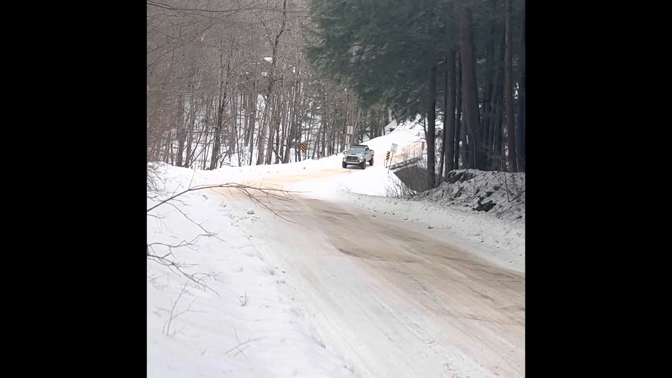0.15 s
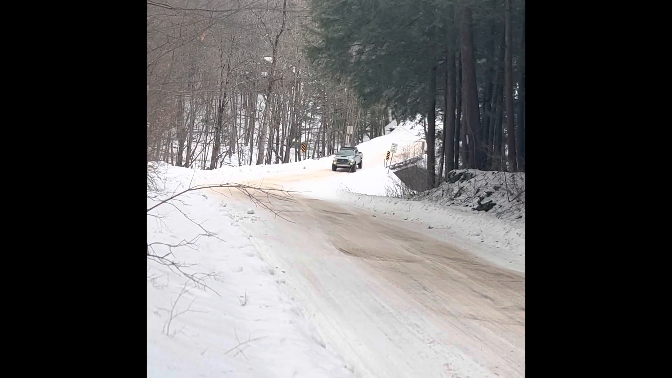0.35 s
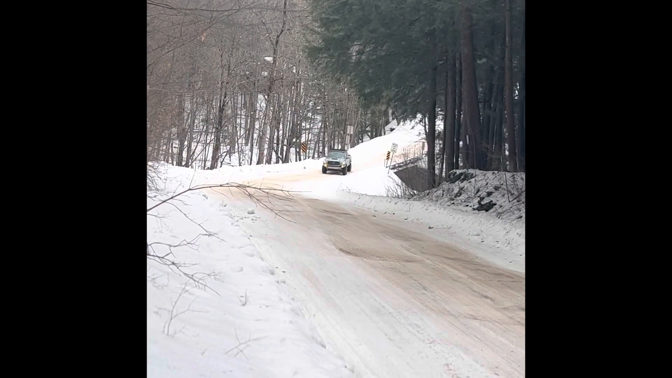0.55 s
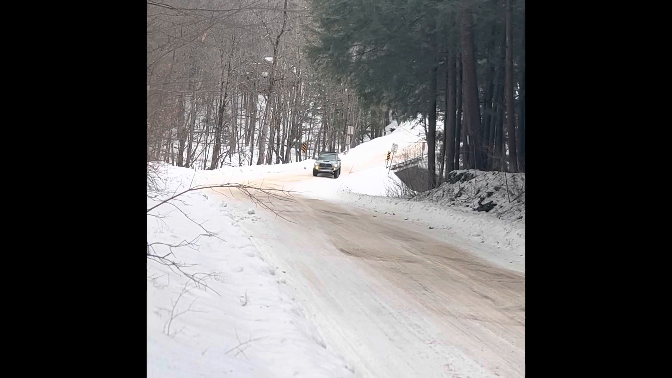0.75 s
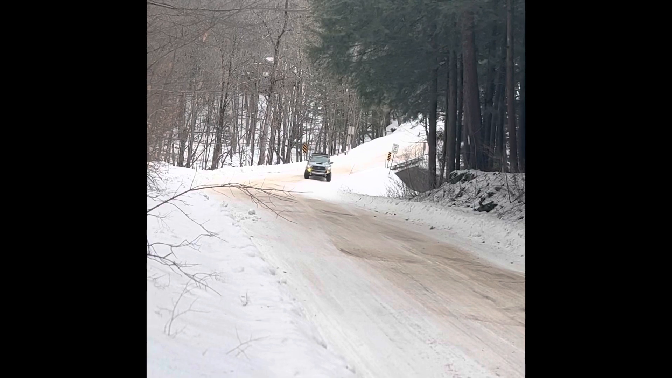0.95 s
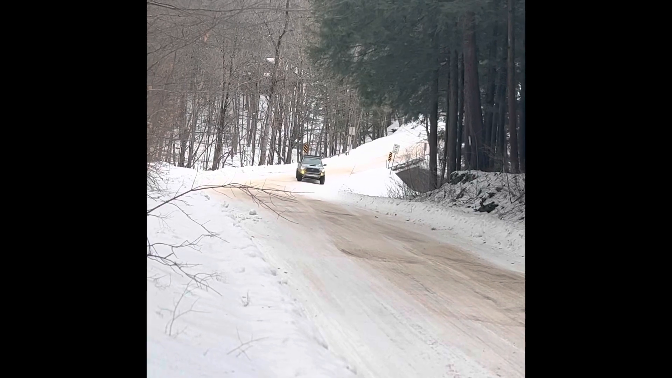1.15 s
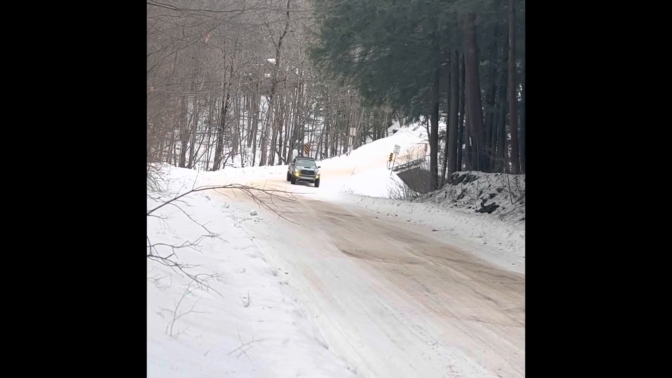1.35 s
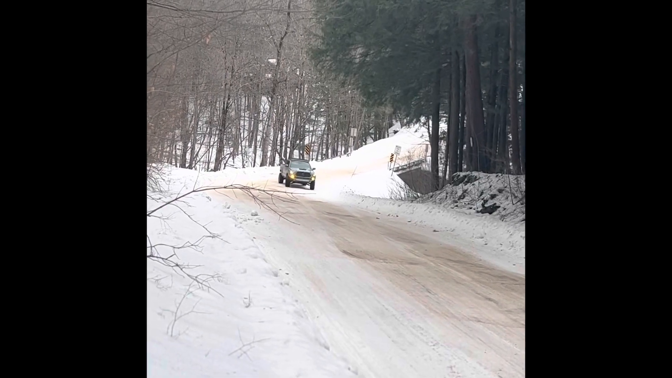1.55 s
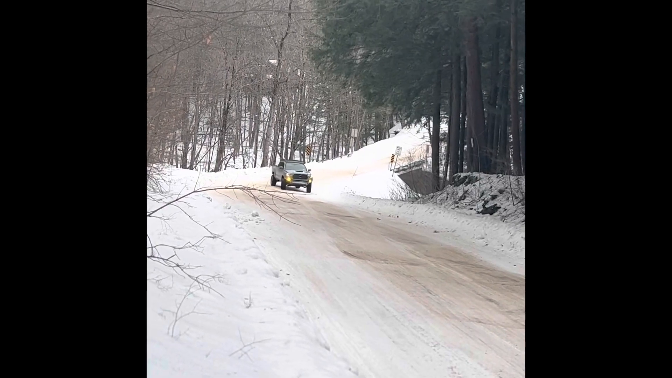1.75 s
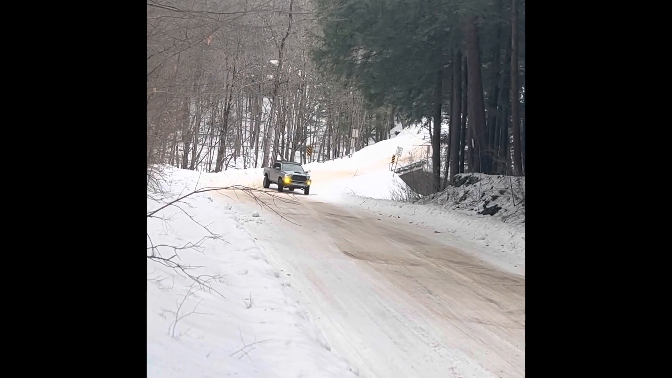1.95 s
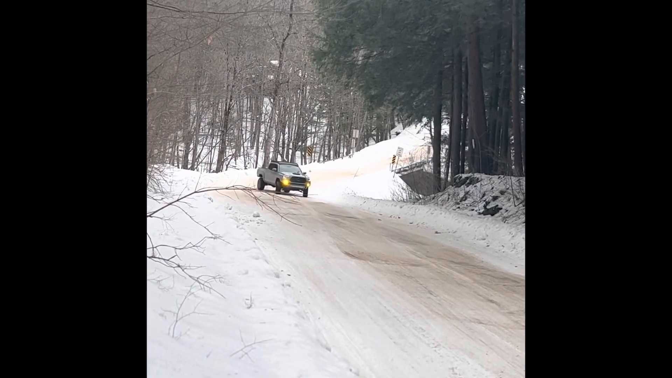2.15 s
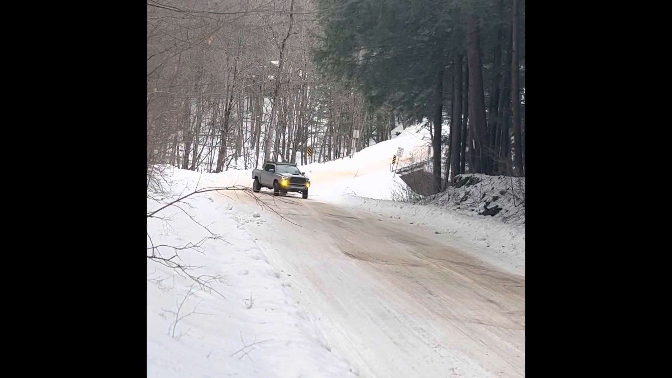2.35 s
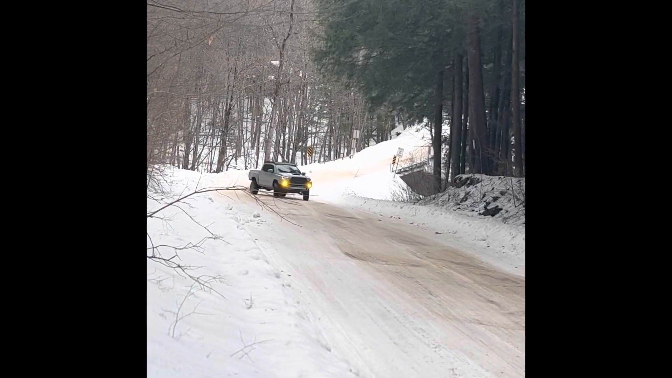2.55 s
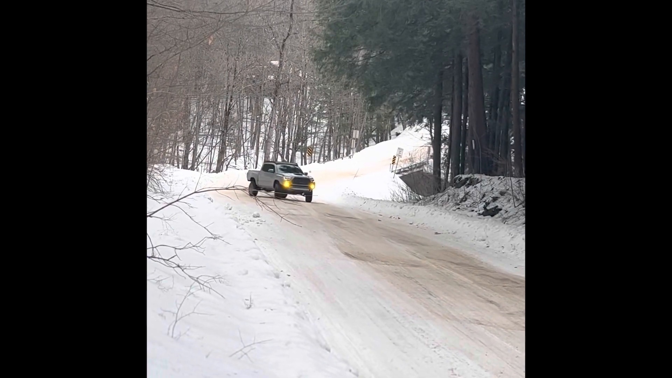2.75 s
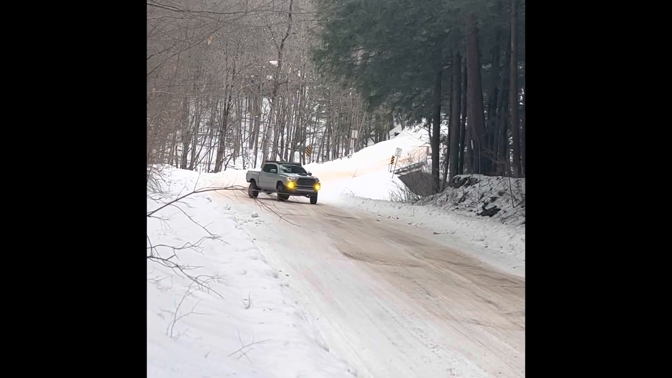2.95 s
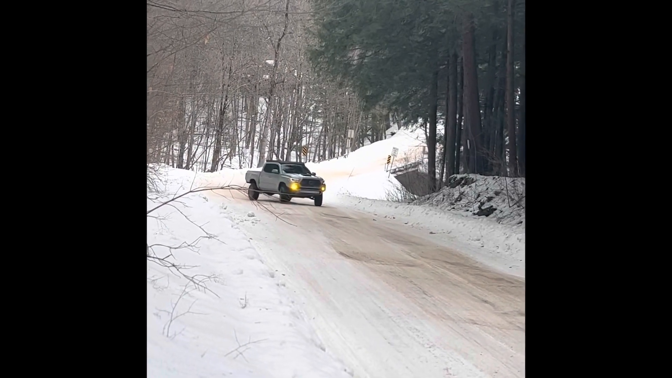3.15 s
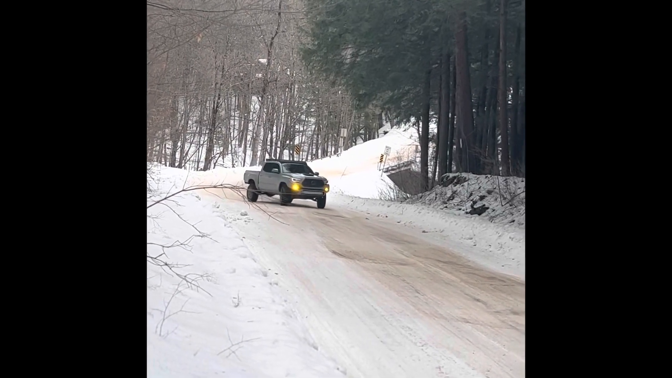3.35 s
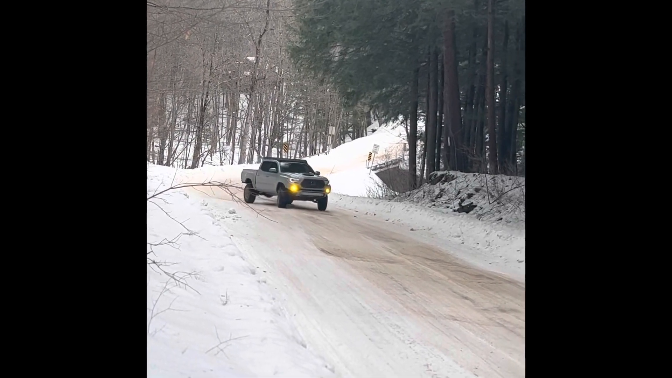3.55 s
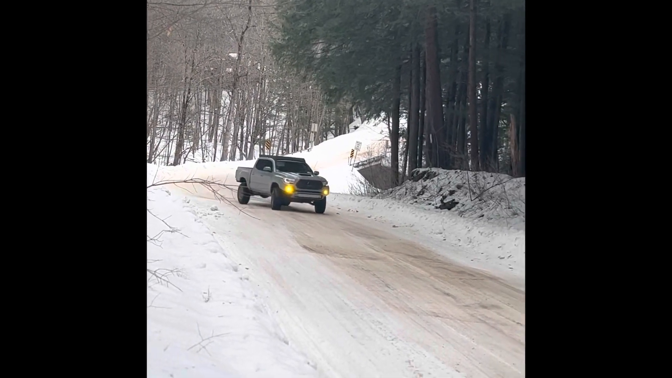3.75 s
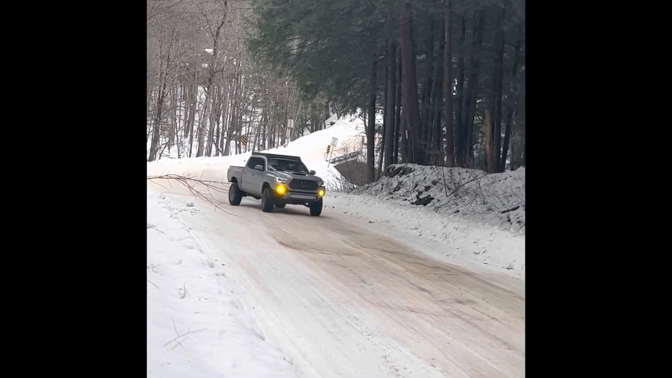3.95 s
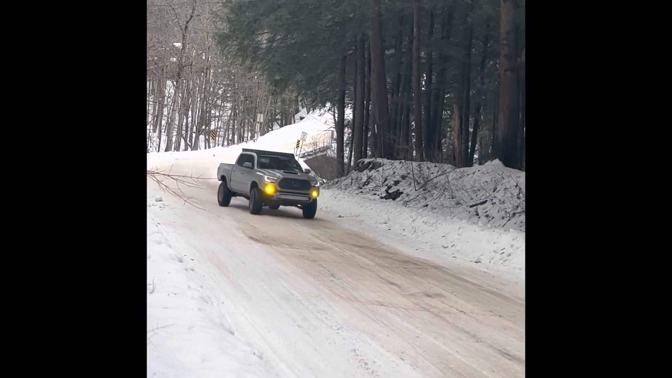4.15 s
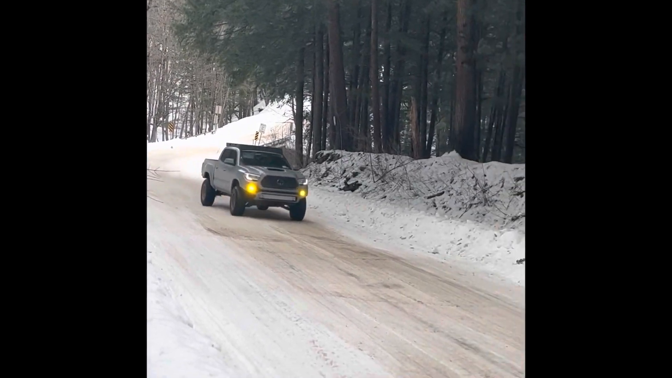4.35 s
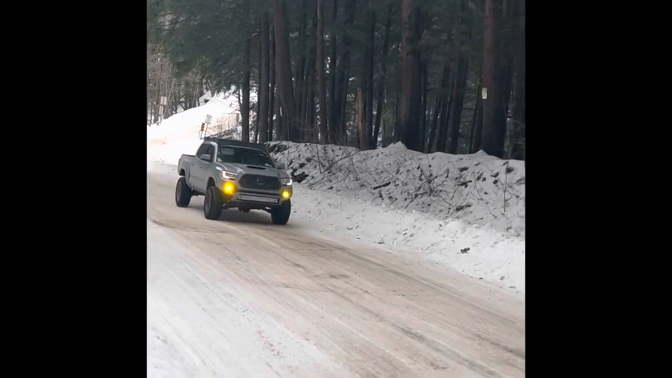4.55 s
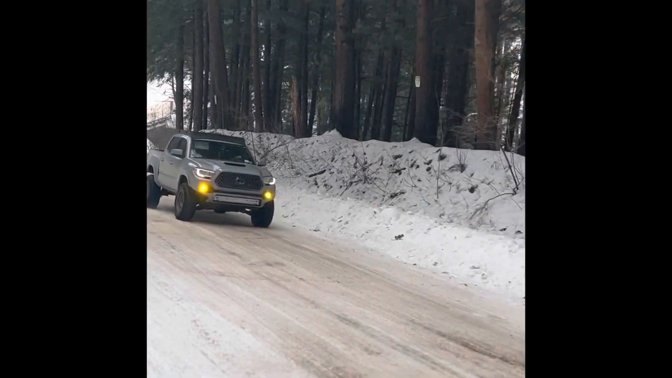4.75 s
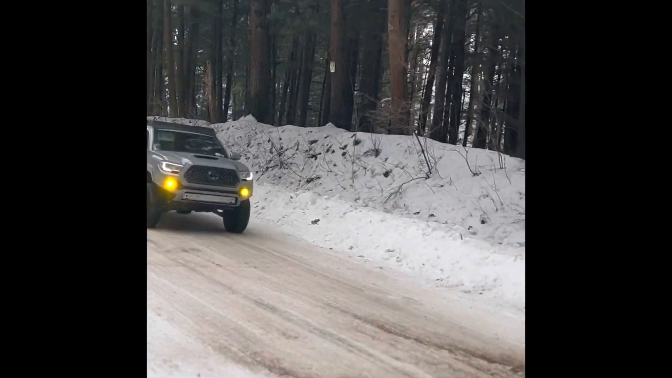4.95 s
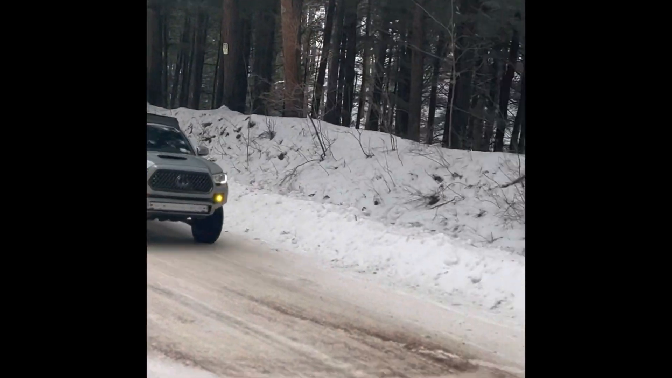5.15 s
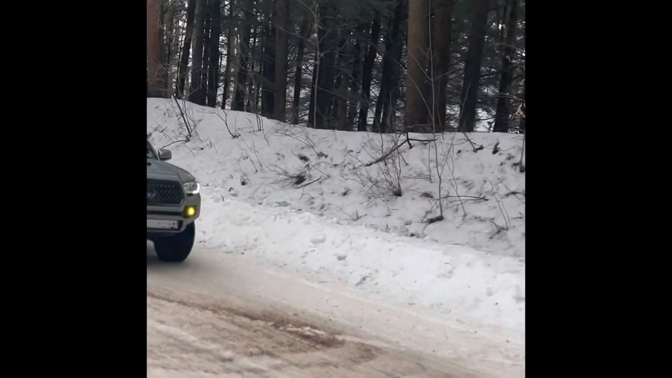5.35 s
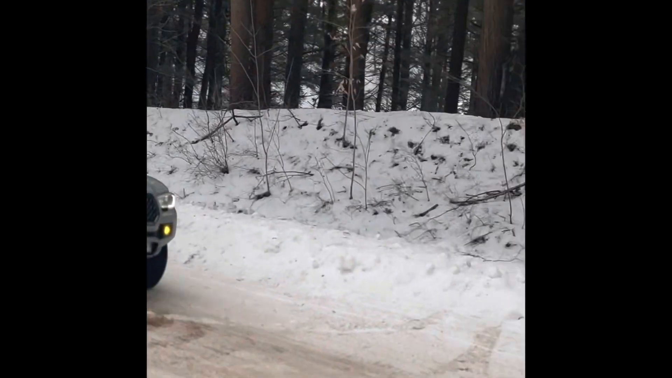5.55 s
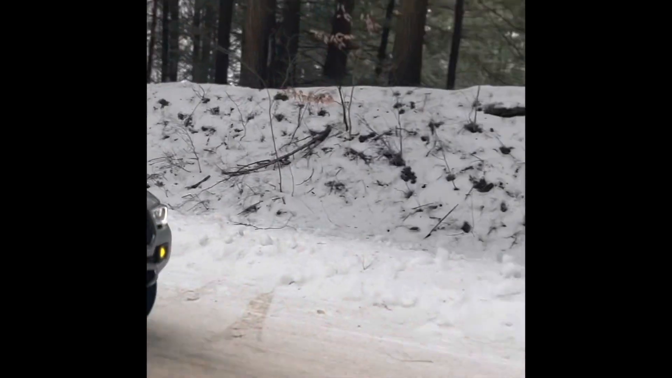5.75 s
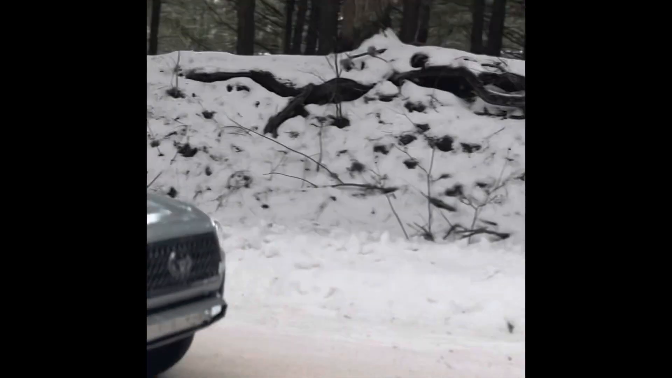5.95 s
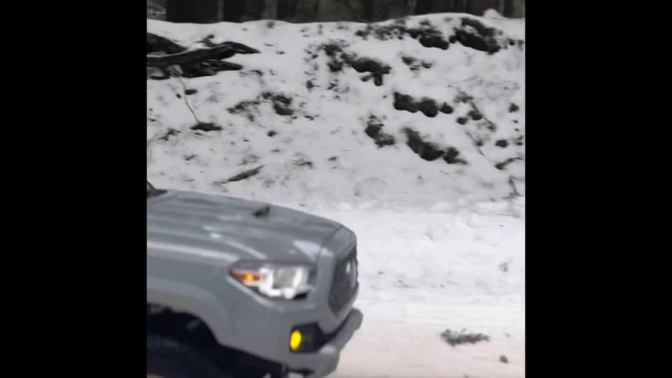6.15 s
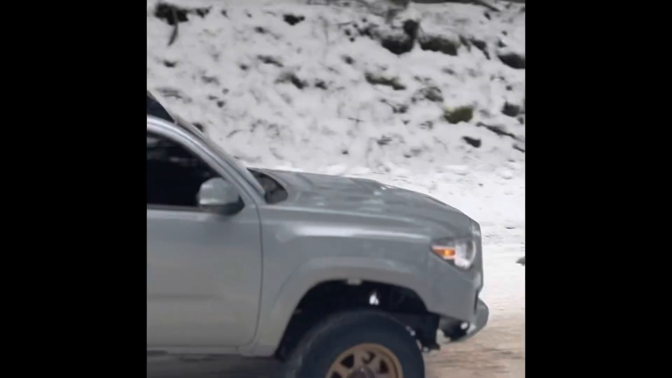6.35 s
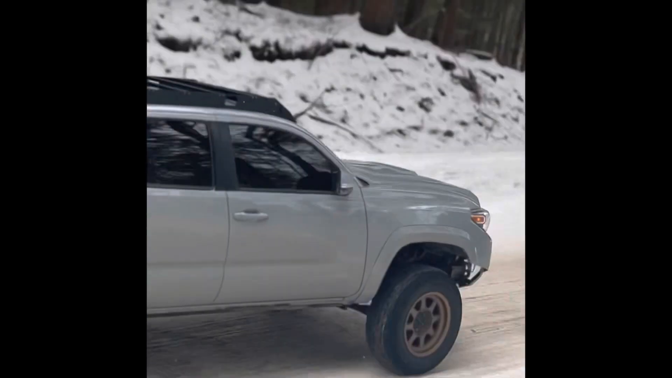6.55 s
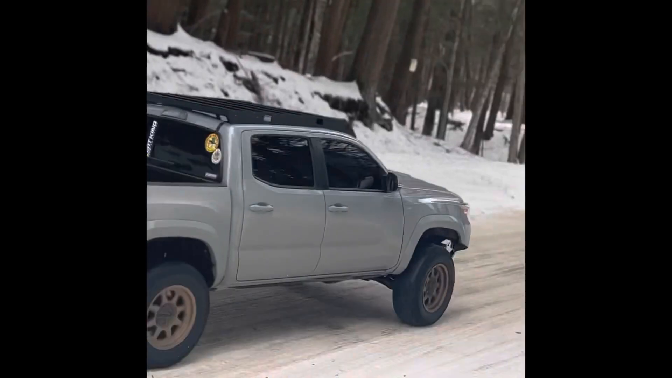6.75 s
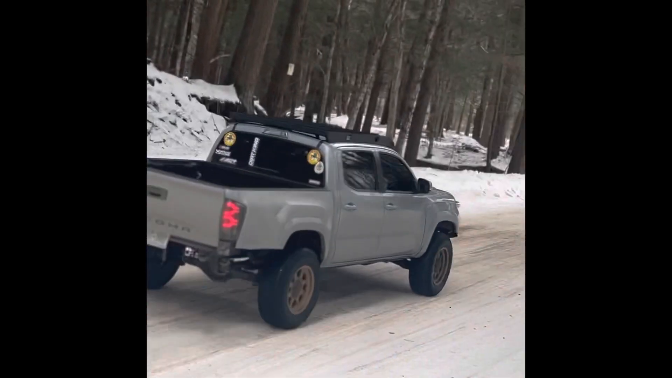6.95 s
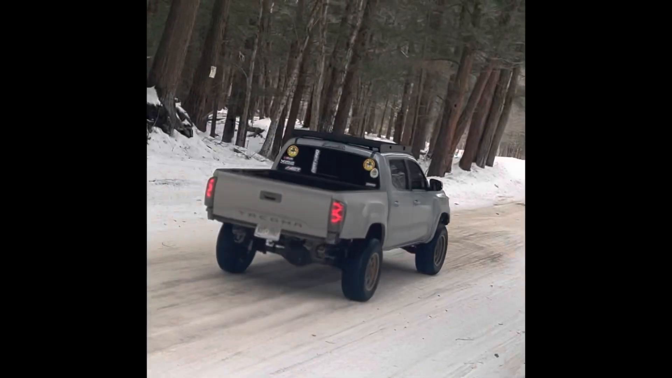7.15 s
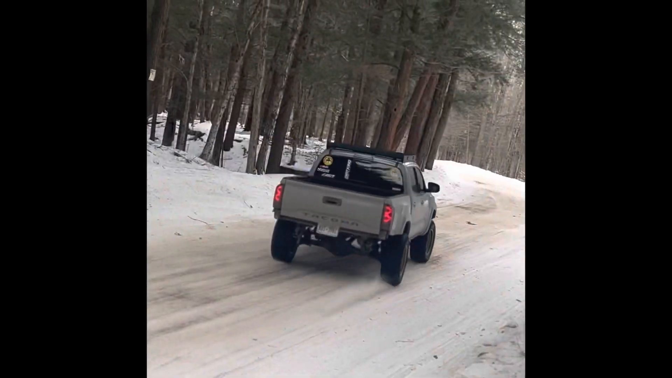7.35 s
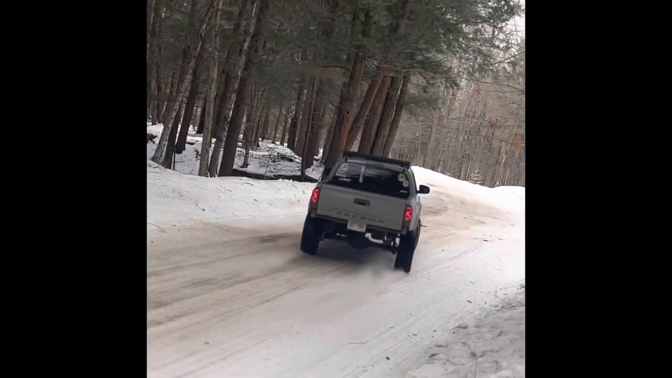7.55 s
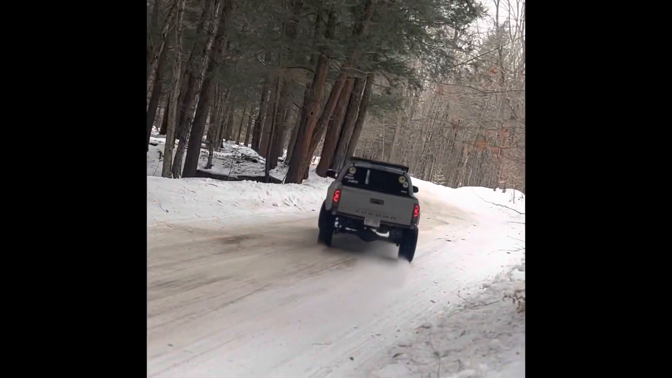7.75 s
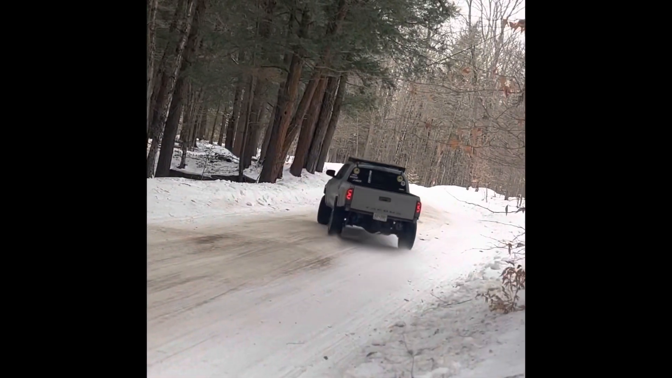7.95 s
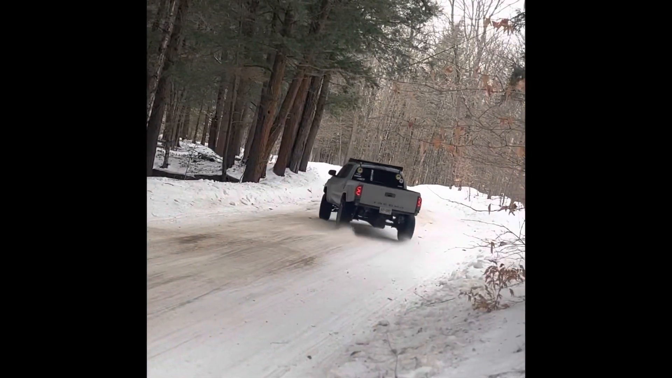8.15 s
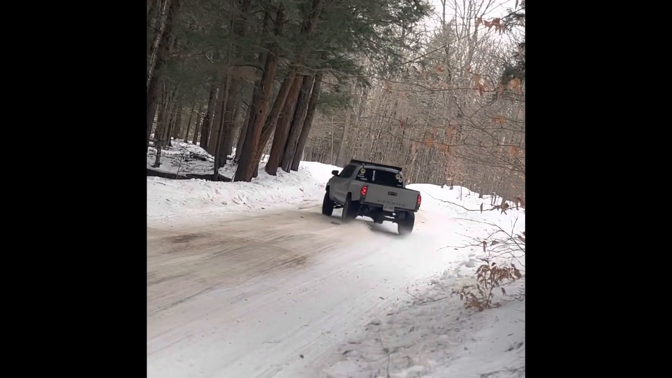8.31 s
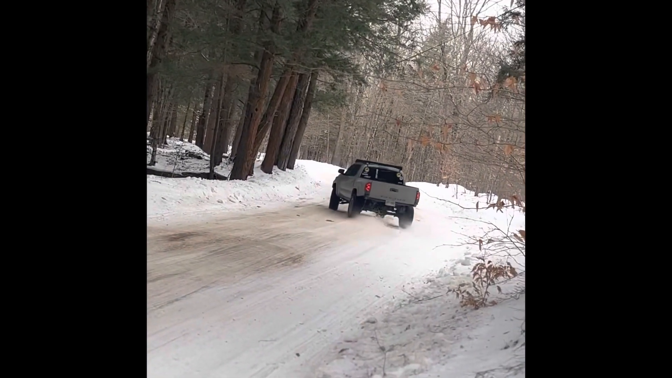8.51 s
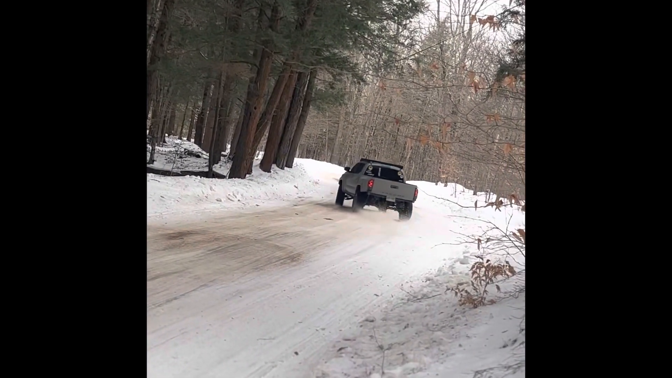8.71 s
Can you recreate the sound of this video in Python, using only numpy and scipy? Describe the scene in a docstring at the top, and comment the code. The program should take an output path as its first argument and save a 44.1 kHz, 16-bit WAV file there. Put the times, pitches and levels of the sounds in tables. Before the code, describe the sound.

A pickup with a raspy exhaust nears on a snowy forest road, roars past close by with tyres scrubbing packed snow, then pulls away.

```python
"""Soft bumps at a hand-held microphone and a low drone come first: a V6 pickup nears on a snowy forest road.
It passes close by just after six seconds and pulls away. The exhaust is a sum of engine orders with pulsed rasp.
Tyres on packed snow are banded noises that follow their bite; they splash, spin, scrub and throw snow and grit.
Delayed noise tails make the trees' echo, a moving delay the snowbank's. Wind puffs, ticks and rubs lie close by."""
import sys
import numpy as np
from scipy import signal
from scipy.fft import rfft, irfft, next_fast_len
from scipy.io import wavfile
from scipy.ndimage import map_coordinates

SR = 44100
rng = np.random.default_rng(int(sys.argv[2]) if len(sys.argv) > 2 else 0)


def waveform_to_disk(signal):
    """Save audio, clipped to [-1, 1], as 16-bit WAV at the path in sys.argv[1]."""
    frames = np.transpose(np.atleast_2d(signal))
    scaled = np.clip(frames, -1, 1) * 32767
    samples = np.round(scaled).astype(np.int16)
    wavfile.write(sys.argv[1], SR, samples)


N = 387198

# Engine speed. Each row: time in seconds, firing rate of one cylinder bank in Hz.
BANK_FIRING = [(0.0, 58.3), (0.22, 64), (0.46, 73.56), (0.85, 82.8), (0.99, 82.1), (1.78, 99.6),
               (1.94, 106), (2.1, 110.7), (2.31, 102.1), (2.76, 112.7), (3.49, 123.3), (3.72, 131.6),
               (3.86, 132.5), (3.93, 137), (4.05, 133.3), (4.16, 125), (4.27, 117.5), (4.34, 108.5),
               (4.5, 100), (4.72, 88.2), (4.86, 87.9), (4.96, 89.1), (5.04, 85.9), (5.154, 91.2),
               (5.228, 98.4), (5.45, 101.3), (5.56, 106.1), (5.68, 114.7), (5.765, 116.7), (5.87, 109),
               (6.01, 100.6), (6.118, 91), (6.196, 88.16), (6.46, 85.83), (6.6, 80.5), (6.8, 68.35),
               (6.97, 62), (7.1, 61.83), (7.65, 70.6), (7.76, 72.13), (7.88, 66.9), (8.03, 64.4),
               (8.35, 71.1), (8.46, 71.4), (8.56, 74.3), (8.78, 77.2)]
# Exhaust as the throttle opens and closes. Each row: time in seconds, level of the firing note in dB,
# lift of the orders above it in dB, extra lift of the odd ones among them in dB.
THROTTLE = [(0, -46, -7, -4), (0.7, -58.5, 1, 5), (1.15, -44.5, -1.5, 1), (1.45, -40, 5.5, -6.5),
            (1.7, -35.5, -6, 1.5), (1.88, -35, -12.5, 3), (2.1, -39.5, -2, 0), (2.3, -40.5, -4, 1),
            (2.7, -40.5, 0, 1.5), (3.3, -35, 4, -8), (3.6, -30.5, 3, -11), (3.98, -35, 13, -21),
            (4.06, -37.5, 13, -9), (4.125, -50, 12, 12), (4.18, -38.5, -4, -1), (4.34, -33, -4, -2),
            (4.43, -43, -6, -2), (4.5, -49, -11, -4), (4.6, -43, 2, 3), (4.72, -36.5, 8.5, -8),
            (5.05, -25.5, 5.5, -7.5), (5.4, -22, 7, -8), (5.54, -19.5, 3.5, -10), (5.66, -20, 4, 0),
            (5.77, -15.5, 5, -8.5), (5.88, -25, -6, 8), (6.02, -21.5, -9, -6), (6.14, -33, 10.5, -8),
            (6.22, -21.5, 1, 0), (6.38, -13.5, -15, 7.5), (6.56, -27, -5.5, 0.5), (6.65, -40, -3, -3),
            (6.95, -38, 3.5, 4), (7.09, -26.5, -3, -0.5), (7.38, -24, -2, -2.5), (7.625, -21.5, -5, -10),
            (7.675, -31, -5.5, 0), (7.79, -44, -7, 1), (7.93, -42.5, -0.5, 6), (8.03, -31.5, -12.5, 7.5),
            (8.24, -27.5, -11, 5), (8.33, -25.5, -5.5, -0.5), (8.78, -24.5, -4.5, -2.5)]
# Resonances of the pipe. Each row: frequency in Hz, level against the firing note in dB.
PIPE_RESONANCES = [(68, -7), (85, -15.5), (115, -14), (200, -7.5), (250, 0), (305, -6.5), (340, -2),
                   (375, -8), (405, -5), (435, -13), (468, -15), (520, -21), (620, -28)]
# Spectra of noise. Each row: frequency in Hz, relative level of the third octave there in dB.
RASP_SPECTRUM = [(400, 8.5), (560, -4), (780, -10), (1050, -14), (1500, -26), (2200, -14.5), (3500, -39)]   # gas tearing out of the pipe
RUMBLE_SPECTRUM = [(25, -25), (38, -6), (52, 0.5), (85, 0.5), (130, -5.5), (200, -15), (400, -10.5)]
BOOM_SPECTRUM = [(70, -20), (120, 1), (220, 3), (380, -2.5), (520, -7), (800, -43)]
ROAR_SPECTRUM = [(250, -3), (480, -3), (620, 2.5), (780, 2.5), (1000, -2), (1250, -7), (1550, -8.5),
                 (2000, -21), (3200, -53)]
CRUNCH_SPECTRUM = [(1000, -24), (1550, 9), (2000, 1.5), (2500, 2), (3200, -6.5), (4200, -7), (6000, -51)]
SCRUB_SPECTRUM = [(500, -6), (750, 5.5), (980, 4), (1250, 0), (1600, -10), (2100, -16), (3500, -55)]
GRIT_SPECTRUM = [(2500, 3.5), (3800, -1.5), (4600, 0.5), (5600, -6), (7000, -7), (10000, -30)]
SPRAY_SPECTRUM = [(4500, -28), (6500, 7), (8500, 7.5), (10300, 8.5), (12000, -4), (16000, 2.5)]
SHATTER_SPECTRUM = [(1800, -8), (2800, 3), (4200, -7), (6000, -3), (10000, -4), (15000, -14)]   # bursting lumps of snow
BUFFET_SPECTRUM = [(35, -25), (55, 1), (85, 0), (115, -17), (180, -5.5)]
RUSTLE_SPECTRUM = [(2700, -24), (3300, -2), (3700, -4), (4500, -2), (5800, -6), (7500, -31)]
# Bite of the tyres on the snow, which drives the road noises. Each row: time in seconds, bite in dB.
TYRE_BITE = [(0.0, -63), (0.71, -62), (0.93, -58.5), (1.64, -56.5), (3.2, -50.5), (3.86, -44), (4.35, -42),
             (4.4, -40), (4.7, -43.5), (5.2, -37), (5.62, -32.5), (6.46, -36), (6.72, -37.5), (6.82, -40.5),
             (6.97, -43.5), (7.65, -45.5), (8.2, -48.5), (8.32, -46), (8.5, -49), (8.78, -49)]
# Bursts of tyre noise: a splash in a rut, wheelspin, sideways scrubs. Each row: start in seconds,
# end in seconds, level of the pitched noise in dB, its pitch in Hz, thrown grit level in dB,
# sag by the end of the burst in dB.
TYRE_BURSTS = [(2.428, 2.62, -39.5, 756, -80, 0.5), (3.701, 4.049, -49, 798.3, -49.5, -2),
               (4.149, 4.28, -31, 1000, -47, 1), (4.394, 4.84, -32.5, 918, -51, 7),
               (5.41, 6.397, -20.5, 903.2, -48, 5.5), (6.576, 6.731, -16.5, 1011, -40, 9),
               (6.761, 7.019, -26, 800.6, -66, 4), (7.67, 8.04, -29, 1189, -63, 6),
               (8.279, 8.38, -41, 899, -50, 0)]
# Brief tones: a low one lingering after the throttle closes, a faint high whine.
# Each row: centre in seconds, half length in seconds, pitch in Hz, level in dB.
BRIEF_TONES = [(4.617, 0.18, 219, -34.5), (7.514, 0.12, 1355, -42.5)]
# Ice cracking under the tyres. Each row: time in seconds, relative level in dB.
ICE_CRACKS = [(4.3806, -23), (4.8535, -29), (6.5384, -25), (6.7003, -23), (7.1352, -37), (7.2966, -33),
              (8.253, -43)]
# Lumps flung from the tyres. Each row: centre in seconds, half length in seconds, level in dB.
SNOW_CLUMPS = [(4.855, 0.0072, -47), (6.59, 0.034, -36), (6.702, .018, -35), (6.752, 0.023, -42),
               (6.893, .02, -45), (7.092, .02, -52)]
# Lead of the left port while the truck is to the side. Each row: time in seconds, lead in ms.
LEFT_LEAD = [(4.6, 0.00055), (5.3, 0.056), (5.9, 0.11), (6.45, 0.14), (6.85, 0.013)]
# Soft bumps on the microphone's housing. Each row: time in seconds, relative level in dB,
# hardness of the contact as its top frequency in Hz.
HOUSING_BUMPS = [(0.308, -20, 600), (0.318, -18.5, 450), (.328, -20, 2200), (.333, -22, 450),
                 (.346, -16.5, 650), (0.422, -31, 400), (0.436, -25, 500), (.457, -28, 300),
                 (0.544, -30, 400), (0.557, -34, 600), (0.569, -28, 400), (2.403, -16, 500),
                 (2.435, -9, 750), (2.453, -16, 550), (2.564, -27, 400)]
# Modes of the housing. Each row: frequency in Hz, mean relative level in dB, decay by 60 dB in seconds.
HOUSING_MODES = [(75, -28, .1), (126, -9, 0.14), (190, -5.5, 0.058), (287, -8.5, 0.025), (400, -25, 0.027),
                 (532, -17, 0.04)]
# Small ticks close by. Each row: time in seconds, relative peak in dB, pitch in Hz.
NEAR_TICKS = [(0.096, -39, 3850), (0.441, -42.5, 3790), (0.4574, -51, 3750), (0.846, -36, 4000),
              (1.3275, -38, 3740), (1.4641, -41, 5960), (1.697, -41, 5770), (1.8777, -48, 5900),
              (1.9613, -46, 5400), (3.2272, -39, 5370)]
# Faint rubs close by. Each row: centre in seconds, half length in seconds, level of the hiss in dB.
NEAR_RUBS = [(1.208, 0.17, -60), (2.12, 0.086, -70)]
# Puffs of wind on the ports. Each row: centre in seconds, half length in seconds, level in dB.
WIND_PUFFS = [(.37, .016, -35), (0.465, 0.026, -39), (1.383, .08, -38), (2.571, 0.029, -30),
              (3.131, 0.054, -42), (3.92, .07, -38), (4.088, 0.068, -32.5), (4.919, 0.046, -25),
              (5.033, 0.049, -29.5), (5.371, 0.083, -32), (6.034, 0.11, -29.5), (6.353, 0.072, -35),
              (6.829, 0.04, -23.5), (6.965, 0.051, -24.5), (7.139, 0.026, -22.5), (7.9, 0.035, -37)]
# Colour of the two ports. Each row: frequency in Hz, left minus right in dB.
PORT_COLOUR = [(70, -0.5), (200, 1.25), (450, -0.6), (720, 3), (1150, 2), (1450, 7.5), (1900, 3.5),
               (2800, 0.5), (3800, -4), (5700, -2.5), (8000, 0)]
# Phase between the ports. Each row: frequency in Hz, lead of the left in radians.
PORT_LEAD_PHASE = [(100, 0), (1000, .25), (1300, .8), (1600, 0), (2400, -.3), (3300, -1.2), (4700, 0),
                   (5700, 1.6), (7150, 3.1), (9000, 6), (10300, 6.6), (12800, 9.4), (15200, 12.5)]
# Likeness of the noise at the two ports. Each row: frequency in Hz, likeness from 0 to 1.
PORT_LIKENESS = [(50, .84), (200, .98), (700, .95), (1400, .85), (2400, .85), (3500, .62), (5500, .4),
                 (9500, .8), (15000, .78)]

PASS_S, NEAREST_M, SPEED_M_PER_S = 6.3, 4.3, 8.9
SOUND_M_PER_S = 343
# The farther the truck, the more of its noise comes by way of the trees.
SCATTER_M, SCATTER_GROWTH, SCATTER_BEHIND_DB = 17, 0.4, -2.5
BANK_DETOUR_M, BANK_ECHO_DB = 3.0, -24   # snowbank across the road
TYRES_USUAL_DB = -40
SPIN_DB_PER_OCTAVE = 3   # higher revs spin the wheels and throw more grit and snow
SCRUB_HZ = 987.3   # pitch at which the scrub noise plays unshifted
BURST_ATTACK_S, BURST_RELEASE_S = 0.057, 0.045
CONTACT_SPAN = 6.2   # ratio of the highest to the lowest pitch that a contact stirs
FLOOR_HISS_DB, AIR_DB = -75.5, -49   # least spray noise; air never quite still on the ports
CUTOFF_HZ = 15900


def from_db(db):
    """Amplitude gain is ten to the power of a twentieth of the decibels."""
    return 10 ** (np.asarray(db) / 20)


def rms_one(x):
    """Division by the root mean square gives unit power."""
    return x / np.sqrt(np.mean(x ** 2) + 1e-20)


def in_time(rows):
    """Linear interpolation gives each column of a curve at every sample."""
    s, *columns = np.transpose(rows)
    return [np.interp(np.arange(N) / SR, s, column) for column in columns]


def at_hz(points, hz):
    """A spectrum is interpolated along logarithmic frequency."""
    table_hz, values = np.array(points).T
    return np.interp(np.log(hz + 1e-9), np.log(table_hz), values)


def swell(s, width_s):
    """A Gaussian rises and falls around one moment, down to 1/e at the half length."""
    return np.exp(-np.minimum(((np.arange(N) / SR - s) / width_s) ** 2, 50))


def drift(rate_hz):
    """Noise through two equal poles wanders slowly, with unit rms."""
    step = 40   # samples between slow values
    r = np.exp(-2 * np.pi * rate_hz * step / SR)
    chance = rng.standard_normal(N // step + 2002)
    slow = signal.lfilter([1], [1, -2 * r, r * r], chance)[2000:]   # skip the settling
    return np.interp(np.arange(N) / step, np.arange(len(slow)), rms_one(slow))


def low_pass(x, hz):
    """A second-order filter attenuates what lies above its corner."""
    return signal.sosfilt(signal.butter(2, min(hz, SR / 2 - 1), fs=SR, output="sos"), x)


def band_pass(x, low_hz, high_hz, order=2):
    """A band-pass filter keeps what lies between two corners."""
    return signal.sosfilt(signal.butter(order, [low_hz, high_hz], "band", fs=SR, output="sos"), x)


def ring(clicks, hz, t60):
    """A two-pole resonator answers a unit click with a dying sine of initial height 1."""
    r, w = from_db(-60 / (t60 * SR)), 2 * np.pi * hz / SR
    return signal.lfilter([0, np.sin(w)], [1, -2 * r * np.cos(w), r * r], clicks + 1e-18)


def late(x, seconds):
    """A changing delay is a reading of the sound at shifted times."""
    return map_coordinates(x, [np.arange(N) - seconds * SR], order=3, mode="nearest")


def banded_noise(spectrum, patchy_db, width=1):
    """Partial coherence: third octaves flicker apart, mixed from middle and side (scaled by width); rms 1."""
    middle, sides, edges = 0, 0, 22 * 2 ** (np.arange(30) / 3)
    white = rng.standard_normal((2, 2, N))   # neighbouring bands take different noise
    for k, (low, high) in enumerate(zip(edges, edges[1:])):
        hz = np.sqrt(low * high)
        if high > spectrum[0][0] and low < spectrum[-1][0]:
            mid, side = band_pass(white[k % 2], low, high)
            alike = np.clip(at_hz(PORT_LIKENESS, hz), 0, 1)
            gain = from_db(at_hz(spectrum, hz) + patchy_db * drift(9.7))
            middle = middle + gain * np.sqrt(1 + alike) * mid
            sides = sides + gain * np.sqrt(1 - alike) * side
    return rms_one(middle + width * sides * np.array([[1], [-1]]))


def grains(per_s, share):
    """Shot noise: snow clumps crack at random and give a share of a noise's power."""
    heights = from_db(2.5 * np.minimum(rng.exponential(1, N), 5))
    hits = (rng.random(N) < per_s / SR) * heights
    power = signal.lfilter([1], [1, -np.exp(-1 / (0.0018 * SR))], hits ** 2 + 1e-18)
    share = np.clip(share, 0, 1)
    return np.sqrt(1 - share + share * power / power.mean())


def passing():
    """Straight-line motion: how far the truck is alongside (0-1), tail towards us (0-1), and distant (m)."""
    along_m = SPEED_M_PER_S * (np.arange(N) / SR - PASS_S)
    distance_m = np.hypot(NEAREST_M, along_m)
    return (NEAREST_M / distance_m) ** 2, (1 + along_m / distance_m) / 2, distance_m


def truck():
    """Superposition: exhaust, tyres and thrown snow add, reaching the nearer port first."""
    bank_hz, = in_time(BANK_FIRING)
    lead_ms, = in_time(LEFT_LEAD)
    _, behind, distance_m = passing()
    scatter = (distance_m / SCATTER_M) ** SCATTER_GROWTH * from_db(SCATTER_BEHIND_DB * behind)
    turn = 2 * np.pi * np.cumsum(bank_hz * (1 + 0.003 * drift(9.6))) / SR
    ruts = from_db(0.55 * drift(10))   # the tyres' load changes on the rutted snow
    # once the open pipe faces the microphone its pulses arrive sharp
    exhaust = drone(turn, order_levels(bank_hz, count=6), waver_db=0.7, uneven=0.09,
                    pipe_hz=620, dispersion=0.6 - 0.47 * behind)
    echo = from_db(-17) * forest(exhaust, t60=0.7, dull_hz=900)
    road = snowbank(roar(scatter) + crunch(scatter) * ruts + tyre_bursts(scatter), distance_m)
    body = exhaust + rasp(turn, scatter) + echo + rumble() + boom(scatter) + road
    body = body + brief_tones(wobble=0.008)
    left, right = body + cracks(t60=0.069, level_db=-4.5)
    thrown = grit_and_spray(bank_hz) * ruts + clumps()
    return np.array([late(left, -lead_ms / 1000), right]) + thrown


def order_levels(bank_hz, count):
    """Resonance: order 2 is the firing note; the others swell as they cross the pipe's resonances."""
    note_db, lift_db, odd_db = in_time(THROTTLE)
    levels_db = []
    for k in range(1, count + 1):
        pipe_db = (k != 2) * at_hz(PIPE_RESONANCES, k * bank_hz)
        throttle_db = (k > 2) * (lift_db + (k % 2) * odd_db)
        levels_db.append(note_db + pipe_db + throttle_db)
    return levels_db


def drone(turn, levels_db, waver_db, uneven, pipe_hz, dispersion):
    """Harmonic series of banks firing in turn; the pipe disperses each pulse and swallows high orders."""
    out = 0
    for k, level_db in enumerate(levels_db, 1):
        height = np.sqrt(2) * from_db(level_db + waver_db * drift(6.7))
        out = out + height * np.cos(k * turn - dispersion * k * k)
    out = out * (1 + uneven * drift(56))   # no two firings are equally strong
    return signal.sosfilt(signal.butter(4, pipe_hz, fs=SR, output="sos"), out)


def puffs(turn, sharpness):
    """Periodic flow: gas leaves in one puff per firing, one bank a little stronger."""
    return rms_one(np.exp(sharpness * (np.cos(2 * turn) + 0.12 * np.cos(turn))))


def rasp(turn, width):
    """Amplitude modulation: turbulent gas hisses in step with the firings."""
    note_db, _, _ = in_time(THROTTLE)
    noise = banded_noise(RASP_SPECTRUM, patchy_db=4.5, width=width)
    return from_db(note_db - 16.0) * noise * puffs(turn, sharpness=1.1)


def brief_tones(wobble):
    """Slightly unsteady sines under Gaussian envelopes give a lingering low tone and a faint high whine."""
    clock = np.cumsum(1 + wobble * drift(13.3)) / SR
    out = 0
    for s, width_s, hz, db in BRIEF_TONES:
        out = out + from_db(db) * swell(s, width_s) * np.sqrt(2) * np.cos(2 * np.pi * hz * clock)
    return out


def road_gain(level_db, follows, alongside_db, behind_db):
    """Directivity: a road noise follows the tyres' bite and differs to the side and to the rear."""
    bite_db, = in_time(TYRE_BITE)
    alongside, behind, _ = passing()
    bite_gain_db = follows * (bite_db - TYRES_USUAL_DB)
    return from_db(level_db + bite_gain_db + alongside_db * alongside + behind_db * behind)


def rumble():
    """Broadband excitation: the lowest road noise follows the tyres' bite."""
    gain = road_gain(level_db=-36.0, follows=0.88, alongside_db=-0.5, behind_db=0.0)
    return gain * banded_noise(RUMBLE_SPECTRUM, patchy_db=1.5)


def boom(width):
    """Cavity sound: body and wheel wells boom, strongest alongside."""
    gain = road_gain(level_db=-35.5, follows=0.59, alongside_db=9.0, behind_db=-1.9)
    return gain * banded_noise(BOOM_SPECTRUM, patchy_db=2.0, width=width)


def roar(width):
    """Granular contact: tyres on packed snow make mid-range noise with a share of cracks."""
    gain = road_gain(level_db=-29.5, follows=1.096, alongside_db=-0.5, behind_db=4)
    return gain * banded_noise(ROAR_SPECTRUM, patchy_db=2.5, width=width) * grains(per_s=360, share=0.13)


def crunch(width):
    """Granular fracture: denser cracks brighten the noise of the snow."""
    gain = road_gain(level_db=-36.0, follows=1.0, alongside_db=6.0, behind_db=-6.5)
    return gain * banded_noise(CRUNCH_SPECTRUM, patchy_db=1.4, width=width) * grains(per_s=760, share=0.2)


def tyre_bursts(width):
    """Enveloped noise: splash, wheelspin and scrubs rise, sag or grow and let go; resampling sets the pitch."""
    t, scrub_gain, grit_gain, pitches = np.arange(N) / SR, 0, 0, []
    for start, end, scrub_db, hz, grit_db, sag_db in TYRE_BURSTS:
        heights = [0, 1, from_db(-sag_db), 0]
        envelope = np.interp(t, [start - BURST_ATTACK_S, start, end, end + BURST_RELEASE_S], heights)
        scrub_gain = scrub_gain + from_db(scrub_db) * envelope
        grit_gain = grit_gain + from_db(grit_db) * envelope
        pitches += [(start, hz), (end, hz)]
    pitch_hz, = in_time(pitches)
    travel = np.cumsum(pitch_hz / SCRUB_HZ) % (N - 1)   # reading position in samples
    noise = banded_noise(SCRUB_SPECTRUM, patchy_db=1.0, width=width)
    scrub = np.array([map_coordinates(side, [travel], order=3) for side in noise])
    grit = banded_noise(GRIT_SPECTRUM, patchy_db=3.0) * grains(per_s=1700, share=0.28)
    return scrub_gain * scrub * grains(per_s=180, share=0.13) + grit_gain * grit


def snowbank(x, distance_m):
    """Comb filtering: the bank's echo lags most as the truck goes by, so colour sweeps down and up again."""
    detour_m = np.sqrt(distance_m ** 2 + BANK_DETOUR_M * (BANK_DETOUR_M + 2 * NEAREST_M)) - distance_m
    echo = np.array([late(side, detour_m / SOUND_M_PER_S) for side in x])
    return x + from_db(BANK_ECHO_DB) * echo


def cracks(t60, level_db):
    """Brittle fracture: a crust of ice gives way in a short, dying burst of crunch."""
    s, db = np.transpose(ICE_CRACKS)
    breaks = np.zeros(N)
    breaks[(s * SR).astype(int)] = from_db(db + level_db)
    dying = signal.lfilter([1], [1, -np.exp(-np.log(1000) / (t60 * SR))], breaks + 1e-18)
    return low_pass(dying * banded_noise(CRUNCH_SPECTRUM, patchy_db=2.5), 5000)


def grit_and_spray(bank_hz):
    """Many small impacts: thrown grit and finer snow follow bite and revs, above a floor of hiss."""
    spin = from_db(SPIN_DB_PER_OCTAVE * np.log2(bank_hz / bank_hz.mean()))
    grit_gain = spin * road_gain(level_db=-51.0, follows=0.86, alongside_db=-3.0, behind_db=8.5)
    grit = grit_gain * banded_noise(GRIT_SPECTRUM, patchy_db=2.0) * grains(per_s=1900, share=0.17)
    spray_gain = spin * road_gain(level_db=-54.5, follows=1.55, alongside_db=6.5, behind_db=5.0)
    spray_gain = np.hypot(spray_gain, from_db(FLOOR_HISS_DB))
    spray = spray_gain * banded_noise(SPRAY_SPECTRUM, patchy_db=1.2) * grains(per_s=2500, share=0.14)
    return grit + spray


def clumps():
    """Fragmentation: lumps of snow fly off the tyres and burst into coarse, bright grains."""
    bursting = sum(from_db(db) * swell(s, width_s) for s, width_s, db in SNOW_CLUMPS)
    return bursting * banded_noise(SHATTER_SPECTRUM, patchy_db=4.0) * grains(per_s=530, share=0.5)


def forest(x, t60, dull_hz):
    """Multiple scattering: trunks return a dull, dying echo, different on each side."""
    t = np.arange(SR) / SR
    decay = np.exp(-np.log(1000) * t / t60) * (t > 0.03)
    middle, side = low_pass(rng.standard_normal((2, SR)), dull_hz) * decay
    echoes = middle + 0.35 * side * np.array([[1], [-1]])
    wet = signal.fftconvolve(x[None], echoes, axes=1)[:, :N]
    return rms_one(wet) * np.std(x)


def bumps(port_lag_s):
    """Modal excitation: a contact rings the housing, thinner and brighter if harder; the right port lags."""
    out, push = np.zeros(N), signal.unit_impulse(SR // 4)
    for s, db, contact_hz in HOUSING_BUMPS:
        body = 0
        for hz, level_db, t60 in HOUSING_MODES:
            body = body + from_db(db + level_db + rng.normal(0, 1)) * ring(push, hz, t60)
        start = int(s * SR)
        out[start:start + len(push)] += band_pass(body, contact_hz / CONTACT_SPAN, contact_hz, order=2)
    return np.array([out, late(out, port_lag_s)])


def ticks(t60, level_db, edge_db):
    """Transients: a few milliseconds of noise around one pitch, with a fainter broad edge."""
    out, t = np.zeros(N), np.arange(SR // 20) / SR
    for s, db, hz in NEAR_TICKS:
        burst = rng.standard_normal(len(t)) * np.exp(-np.log(1000) * t / t60)
        edge = from_db(edge_db) * band_pass(burst, 2800, 7500)
        snap = edge + band_pass(burst, hz * 0.88, hz * 1.11, order=4)
        start = int(s * SR)
        out[start:start + len(t)] += from_db(db + level_db) * snap / np.abs(snap).max()
    return out


def rustle(squeak_hz, t60, squeak_db):
    """Friction: faint rubs give hiss with a thin, noise-driven resonance in it."""
    squeak = from_db(squeak_db) * rms_one(ring(rng.standard_normal(N), squeak_hz, t60))
    rubbing = sum(from_db(db) * swell(s, width_s) for s, width_s, db in NEAR_RUBS)
    return rubbing * (banded_noise(RUSTLE_SPECTRUM, patchy_db=3.0) + squeak)


def wind(width):
    """Turbulent pressure: a faint low flutter stays on the ports, and puffs swell and die over it."""
    puffing = sum(from_db(db) * swell(s, width_s) for s, width_s, db in WIND_PUFFS)
    gusts = puffing * banded_noise(BUFFET_SPECTRUM, patchy_db=0.5)
    return gusts + from_db(AIR_DB) * banded_noise(BUFFET_SPECTRUM, patchy_db=-1.0, width=width)


def scene():
    """Superposition: the truck on the road and the small sounds near the microphone add."""
    nearby = bumps(port_lag_s=0.00041) + ticks(t60=0.0059, level_db=-2, edge_db=-17)
    nearby = nearby + rustle(squeak_hz=3670, t60=0.007, squeak_db=1.0)
    return truck() + wind(width=6.8) + nearby


def record(dry):
    """Linear filtering: the two ports differ in colour and phase, and the top is cut."""
    size = next_fast_len(N + SR // 10)
    hz = np.arange(size // 2 + 1) * SR / size
    tilt = from_db(at_hz(PORT_COLOUR, hz) / 2)   # half the difference on each port
    ports = np.array([tilt * np.exp(1j * at_hz(PORT_LEAD_PHASE, hz)), 1 / tilt])
    soft_ends = np.interp(np.arange(N), [0, 200, N - 200, N], [0, 1, 1, 0])
    heard = irfft(rfft(dry * soft_ends, size) * ports, size)[:, :N]
    return signal.sosfilt(signal.ellip(12, 0.1, 90, CUTOFF_HZ, fs=SR, output="sos"), heard)


dry = scene()
out = record(dry)
waveform_to_disk(out)
```